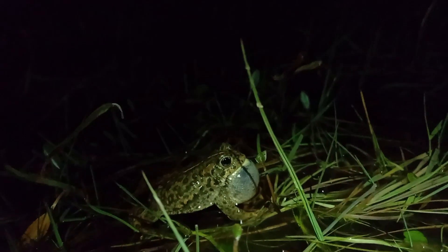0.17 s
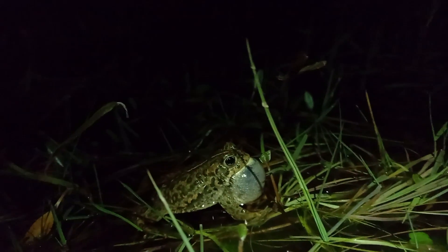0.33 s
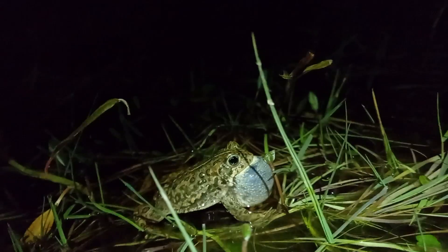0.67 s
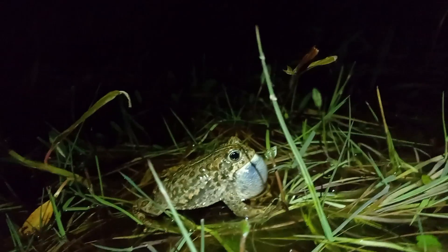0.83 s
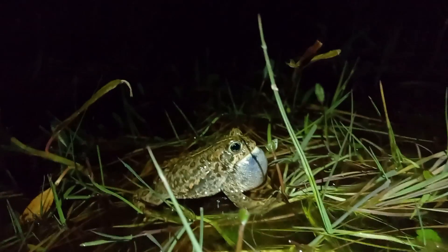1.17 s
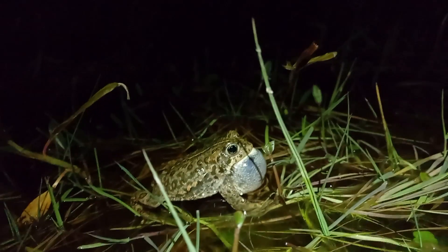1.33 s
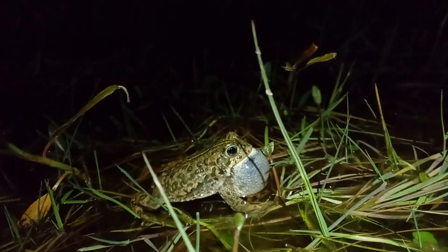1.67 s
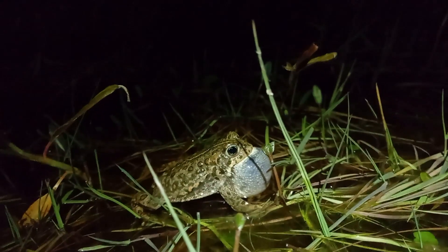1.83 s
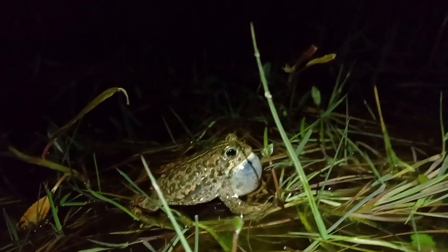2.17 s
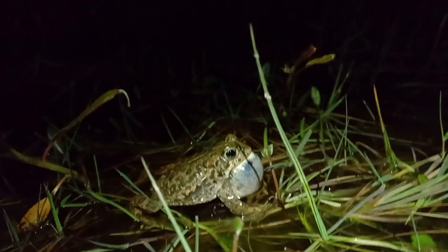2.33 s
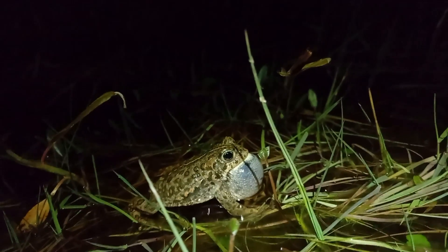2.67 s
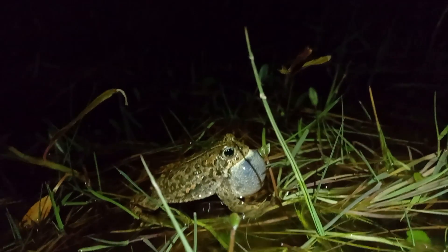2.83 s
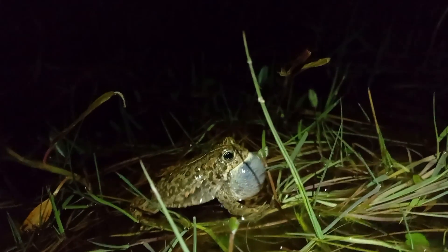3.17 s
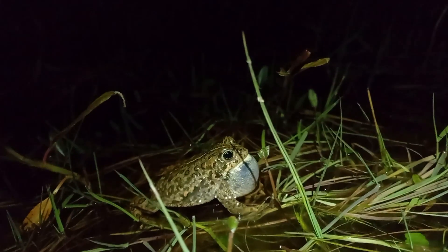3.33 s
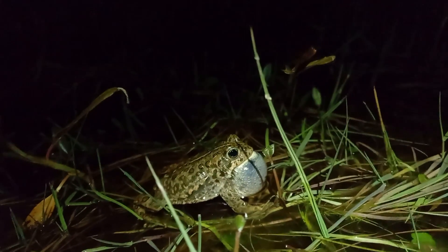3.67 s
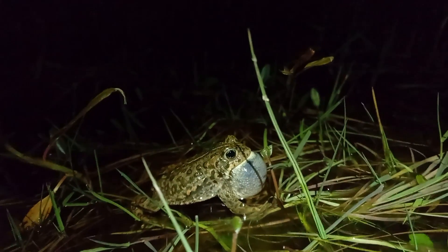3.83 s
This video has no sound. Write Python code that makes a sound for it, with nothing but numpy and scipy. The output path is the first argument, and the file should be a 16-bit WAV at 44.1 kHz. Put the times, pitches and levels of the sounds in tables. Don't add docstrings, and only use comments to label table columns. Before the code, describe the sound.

A toad close by gives loud rasping pulsed croaks at night over a faint distant toad chorus

```python
import sys
import numpy as np
from scipy import signal
from scipy.fft import rfft, irfft
from scipy.io import wavfile
from scipy.ndimage import uniform_filter1d

SR = 44100
rng = np.random.default_rng(int(sys.argv[2]) if len(sys.argv) > 2 else 0)


def materialize(psi):
    bounded = np.clip(np.atleast_2d(psi).T, -1, 1)
    quanta = np.round(bounded * 32767).astype(np.int16)
    wavfile.write(sys.argv[1], SR, quanta)


def to_linear_factor(level_db):
    exponent = np.asarray(level_db, float) / 20
    return 10 ** exponent


N = 176400

LEAD_MS = 2.325
SECOND_DB, THIRD_DB, HOLD_DB = -4.9, -26, -6.3
HOLD_SAG, HOLD_RISE_MS, RELEASE_MS = 0.42, 3.6, 7.0
ENDING_HZ, ENDING_SAG_HZ, ENDING_BEND = 1440, 89, 2
SAC_LOW_HZ, LEAK_DB = 796, -8.5
BANK_DB, BANK_T60_S = -37, 0.13

# start_s [s], level_db [peak dB], pitch_hz [Hz]
FIRST_CROAK = [(0.0333, -3.5, 1403), (0.0839, -4.5, 1432), (0.1473, -4, 1380), (0.186, -4, 1431),
               (0.2382, -4, 1400), (0.3246, -4.5, 1430), (0.3651, -4, 1440), (0.4047, -2.5, 1453),
               (0.4426, -3.5, 1454), (0.485, -2.5, 1467), (0.5348, -2.5, 1454), (0.5703, -1.5, 1465),
               (0.6062, -1.5, 1489), (0.6404, -1, 1476), (0.6831, -1.5, 1480)]
SECOND_CROAK = [(1.1444, -5.5, 1386), (1.1761, -4, 1410), (1.226, -3.5, 1419), (1.3051, -4.5, 1407),
                (1.3725, -4, 1410), (1.4018, -2.5, 1427), (1.437, -2, 1442), (1.4788, -2.5, 1440),
                (1.5484, -3.5, 1440), (1.58, -1.5, 1451), (1.6156, -2, 1460), (1.666, -2.5, 1453),
                (1.718, -1.5, 1470), (1.7507, -1, 1495), (1.7882, -1.5, 1480), (1.8361, -2, 1467)]
THIRD_CROAK = [(2.297, -5.5, 1400), (2.326, -4.5, 1411), (2.3718, -4, 1417), (2.4585, -4.5, 1412),
               (2.5184, -4, 1413), (2.571, -3.5, 1415), (2.6407, -3.5, 1415), (2.6888, -2.5, 1447),
               (2.7225, -2, 1453), (2.7633, -2, 1451), (2.8184, -3, 1437), (2.8763, -1.5, 1463),
               (2.9085, -1, 1483), (2.9452, -1, 1469), (2.99, -1.5, 1480), (3.0452, -2, 1470),
               (3.0956, -3, 1471)]
FOURTH_CROAK = [(3.5078, -5, 1400), (3.536, -3.5, 1417), (3.576, -3.5, 1428), (3.6321, -4.5, 1416),
                (3.7053, -3.5, 1420), (3.7613, -3, 1434), (3.7927, -2, 1440), (3.8323, -2, 1456),
                (3.8752, -2.5, 1452), (3.929, -2, 1446), (3.9619, -1.5, 1480)]
# start_s [s], level_db [peak dB], pitch_hz [Hz]
EDGE_PULSES = [
    (-.0004, -9, 1400),
    (3.994, 0.1, 1475),
]
# start_s [s], level_db [peak dB], second_gap_ms [ms], third_gap_ms [ms], length_ms [ms]
HELD_NOTES = [
    (.7361, -4.4, 8.5, 5.0, 38.5),
    (1.8634, -4.5, 5.4, 4.2, 34.),
    (3.1150, -4.5, 5.5, 4.3, 34.5),
]


def toad():
    out = np.zeros((2, N))
    for start_s, level_db, pitch_hz in FIRST_CROAK + SECOND_CROAK + THIRD_CROAK + FOURTH_CROAK + EDGE_PULSES:
        start, ms = clock(start_s, 40)
        add(out, start, voice(ms, pitch_hz, [(0.00088, level_db)], 0, 0.99))
    for start_s, level_db, second_gap_ms, third_gap_ms, length_ms in HELD_NOTES:
        start, ms = clock(start_s, 50)
        third_ms = second_gap_ms + third_gap_ms
        beats = [(0, level_db), (second_gap_ms, level_db + SECOND_DB), (third_ms, level_db + THIRD_DB)]
        end_ms = length_ms + LEAD_MS
        done = np.clip(ms / end_ms, 0, 1)
        release = np.sin(np.pi / 2 * np.clip((end_ms - ms) / RELEASE_MS, 0, 1)) ** 1.5
        rise = np.sin(np.pi / 2 * np.clip((ms - SAC_DELAY_MS - third_ms) / HOLD_RISE_MS, 0, 1)) ** 2
        hold = to_linear_factor(level_db + HOLD_DB) * rise * (1 - HOLD_SAG * done ** 3) * release
        pitch_hz = ENDING_HZ - ENDING_SAG_HZ * done ** ENDING_BEND
        add(out, start, voice(ms, pitch_hz, beats, hold, release, done))
    sac, folds = out
    call = sac + cavities(folds)
    low_pass = signal.butter(6, SAC_LOW_HZ, fs=SR, output="sos")
    call = call - (1 - to_linear_factor(LEAK_DB)) * signal.sosfiltfilt(low_pass, call, padlen=0)
    return bank(call, BANK_DB, BANK_T60_S)


def clock(start_s, length_ms):
    start = start_s - LEAD_MS / 1000
    return start, (np.arange(int(length_ms * SR / 1000)) - start * SR % 1) * 1000 / SR


SAC_DELAY_MS, RISE_MS, RING_MS = 0.76, 1.75, 3.68
ONSET_HZ, ONSET_MS = 330, 0.66
FOLDS_RISE_MS, FOLDS_ONSET_HZ, FOLDS_ONSET_MS = 1, -150, 1.0
# multiple [times the pitch], pulse_db [dB], delay_ms [ms], fall_ms [ms],
# hold_db [dB in the held note]
FOLD_OVERTONES = [(.6, -35, 0.01, 3, -80), (2, -38, 0.27, 1.1, -35), (3, -40.5, 0.27, .7, -55.5),
                  (4, -59, 1, 0.47, -62.5), (6.15, -59, 1.0, 4.1, -49)]
OVERTONE_CHANGE = [0, 0, 11, -16, -16]


def voice(ms, pitch_hz, beats, hold, release, done=0):
    def beat(delay_ms, rise_ms, fall_ms):
        pulses = sum(to_linear_factor(db) * swell(ms - at_ms - delay_ms, rise_ms, fall_ms) for at_ms, db in beats)
        return pulses * release

    folds_phase = glide(ms, pitch_hz, FOLDS_ONSET_HZ, FOLDS_ONSET_MS)
    folds = 0
    for (multiple, pulse_db, delay_ms, fall_ms, hold_db), change_db in zip(FOLD_OVERTONES, OVERTONE_CHANGE):
        pulsed = to_linear_factor(pulse_db) * beat(delay_ms, FOLDS_RISE_MS, fall_ms)
        held = to_linear_factor(hold_db + change_db * done ** 2) * hold ** 0.5
        folds = folds + (pulsed + held) * np.sin(multiple * folds_phase)
    sac = beat(SAC_DELAY_MS, RISE_MS, RING_MS) + hold
    return np.array([sac * np.sin(glide(ms - SAC_DELAY_MS, pitch_hz, ONSET_HZ, ONSET_MS)), folds])


def glide(ms, pitch_hz, onset_hz, onset_ms):
    hz = pitch_hz + onset_hz * np.exp(-np.maximum(ms, 0) / onset_ms)
    return 2 * np.pi * np.cumsum(hz) / SR


def swell(ms, rise_ms, fall_ms):
    def shape(u):
        return (1 - np.exp(-(u / rise_ms) ** 2.316)) * np.exp(-u / fall_ms)

    return shape(np.maximum(ms, 0)) / shape(np.linspace(0, 20, num=400)).max()


# pitch_hz [Hz], width_hz [Hz], level_db [dB]
HEAD_CAVITIES = [(2860, 190, -6), (4070, 150, 1), (5770, 200, 0), (9090, 100, 0)]


def cavities(x):
    out = signal.sosfilt(signal.butter(6, 5900, fs=SR, output="sos"), x)
    for pitch_hz, width_hz, level_db in HEAD_CAVITIES:
        r = np.exp(-np.pi * width_hz / SR)
        feed = (1 - r * r) / 2 * np.array([1, 0, -1])
        ring = [1, -2 * r * np.cos(2 * np.pi * pitch_hz / SR), r * r]
        out += to_linear_factor(level_db) * signal.lfilter(feed, ring, x + 1e-18)
    return out


def bank(x, level_db, t60_s):
    tail = rng.standard_normal(SR // 2) * to_linear_factor(-60 * np.arange(SR // 2) / SR / t60_s)
    return x + to_linear_factor(level_db) * signal.fftconvolve(x, tail / np.linalg.norm(tail))[:N]


CHORUS_DB, CHORUS_LOW_HZ, CHORUS_HIGH_HZ = -44.5, 1400, 1713
CHORUS_PULSES_PER_S, CHORUS_SPREAD_DB, CHORUS_RING_MS, CHORUS_RISE_MS = 34, 1.5, 2.6, 1.5
BLUR_DB, BLUR_T60_S = -4.5, 0.47
# low_hz [Hz], high_hz [Hz]
CHORUS_BAND = (1180, 3000)


def chorus():
    out = np.zeros(N)
    ms = np.arange(1500) * 1000 / SR
    for k, pitch_hz in enumerate(np.linspace(CHORUS_LOW_HZ, CHORUS_HIGH_HZ, num=12)):
        draw = rng.random((200, 2))
        start_s = np.cumsum((0.46 + 1.4 * draw[:, 0]) / CHORUS_PULSES_PER_S)
        cycle = (start_s / rng.uniform(1.0, 1.4) + k * 5 / 12) % 1
        keep = (cycle < 0.7) & (start_s < N / SR)
        clicks = np.zeros(N)
        clicks[(start_s[keep] * SR).astype(int)] = to_linear_factor(CHORUS_SPREAD_DB * (rng.normal() + draw[keep, 1]))
        pulse = swell(ms, CHORUS_RISE_MS, CHORUS_RING_MS) * np.sin(2 * np.pi * pitch_hz * ms / 1000)
        out += signal.fftconvolve(clicks, pulse)[:N]
    out = bank(out, BLUR_DB, BLUR_T60_S)
    out = signal.sosfilt(signal.butter(4, CHORUS_BAND, "band", fs=SR, output="sos"), out)
    return to_linear_factor(CHORUS_DB) * out / np.sqrt(uniform_filter1d(out ** 2, size=SR // 3))


RUSTLE_S, RUSTLE_RISE_S, RUSTLE_FALL_S, RUSTLE_DB = 1.358, 0.014, 0.12, -60
# pitch_hz [Hz], level_db [dB per Hz]
RUSTLE_TONE = [(60, -7), (220, 7), (550, 1.5), (2500, -11.5), (4700, -6), (6000, -10), (7100, -3.5),
               (8500, -17.5)]
# start_s [s], level_db [dB], low_hz [Hz], high_hz [Hz], decay_ms [ms]
GRASS_TICKS = [
    (1.329, -47, 300, 4500, 1.5),
    (1.5905, -44, 6200, 12000, 2.0),
    (2.008, -57, 6500, 9500, 1.2),
]


def grass():
    t = np.arange(N) / SR - RUSTLE_S
    grain = to_linear_factor(2 * uniform_filter1d(rng.standard_normal(N), size=100) * 10)
    envelope = np.exp(np.where(t < 0, t / RUSTLE_RISE_S, -t / RUSTLE_FALL_S))
    brush = coloured(RUSTLE_TONE + [(11500, -22), (SR / 2, -60)])
    out = to_linear_factor(RUSTLE_DB) * envelope * grain * brush
    for start_s, level_db, low_hz, high_hz, decay_ms in GRASS_TICKS:
        burst = rng.standard_normal(900) * np.exp(-np.arange(900) * 1000 / SR / decay_ms)
        band = signal.butter(3, [low_hz, high_hz], "band", fs=SR, output="sos")
        add(out, start_s, to_linear_factor(level_db) * signal.sosfilt(band, burst))
    return out


NIGHT_DB, HISS_DB = -73.5, -74
# pitch_hz [Hz], level_db [dB per Hz]
NIGHT_TONE = [(20, -36.5), (40, -17), (80, -5.5), (130, -6.5), (260, -10), (400, -12.5), (1000, -24),
              (2000, -40)]
# pitch_hz [Hz], level_db [dB per Hz]
HISS_TONE = [(1000, 6), (2600, -3.5), (3800, 2.5), (5200, -7), (7000, -2.5), (10800, -3), (11800, -10.5),
             (16000, -10.5)]


def night():
    return to_linear_factor(NIGHT_DB) * coloured(NIGHT_TONE) + to_linear_factor(HISS_DB) * coloured(HISS_TONE)


def coloured(points):
    hz, db = np.transpose(points)
    grid = np.maximum(np.arange(N // 2 + 1) * SR / N, 1)
    gain = to_linear_factor(np.interp(np.log(grid), np.log(hz), db))
    x = irfft(rfft(rng.standard_normal(N)) * gain, N)
    return x / x.std()


def add(out, start_s, x):
    i = int(np.floor(start_s * SR))
    a, b = max(i, 0), min(i + x.shape[-1], N)
    out[..., a:b] += x[..., a - i:b - i]


def scene():
    return (toad() + chorus() + grass() + night())[None]


def top_cut(x):
    return signal.sosfilt(signal.butter(12, 16100, fs=SR, output="sos"), x)


def record(dry):
    mix = signal.sosfilt(signal.cheby2(12, 50, 16100, fs=SR, output="sos"), dry)
    return top_cut(mix)


dry = scene()
out = record(dry)
materialize(out)
```